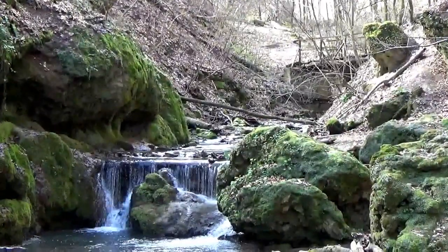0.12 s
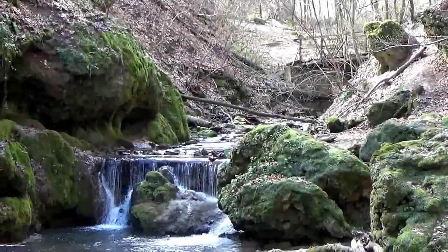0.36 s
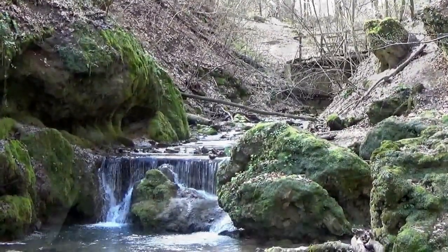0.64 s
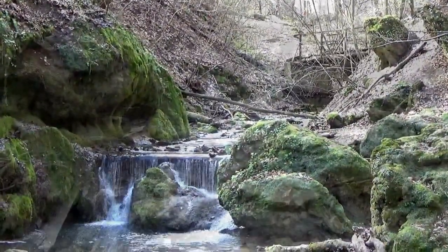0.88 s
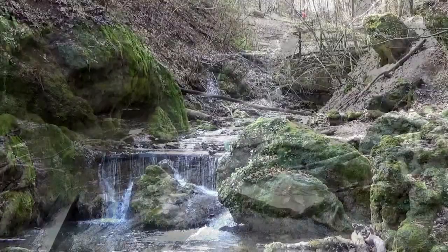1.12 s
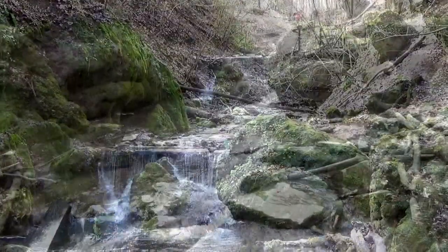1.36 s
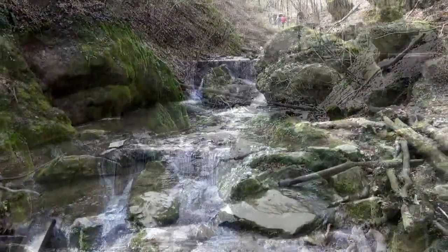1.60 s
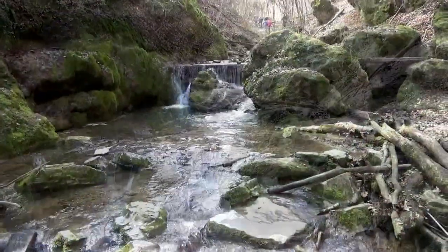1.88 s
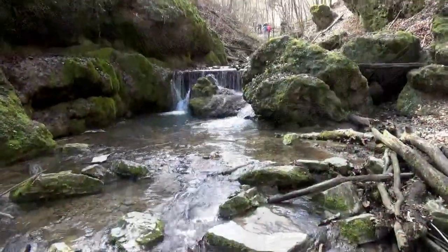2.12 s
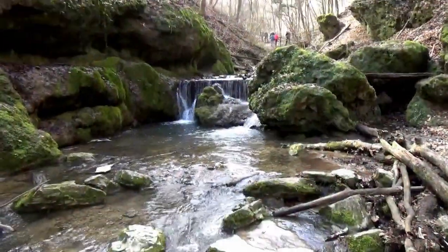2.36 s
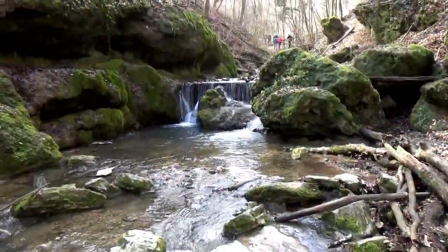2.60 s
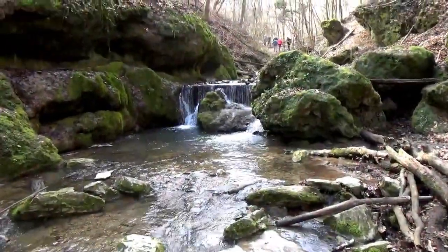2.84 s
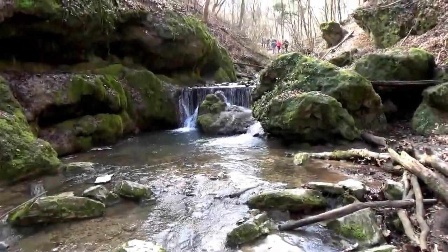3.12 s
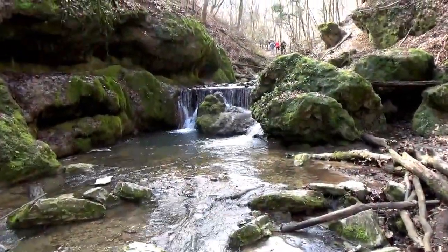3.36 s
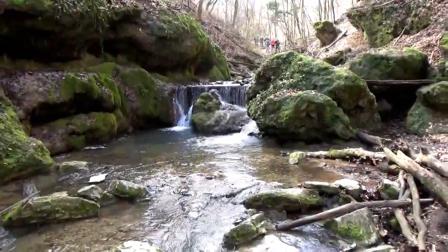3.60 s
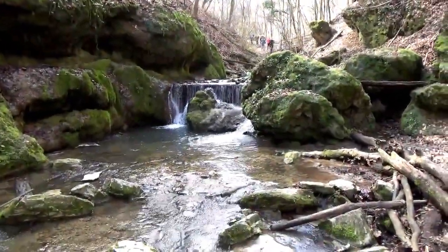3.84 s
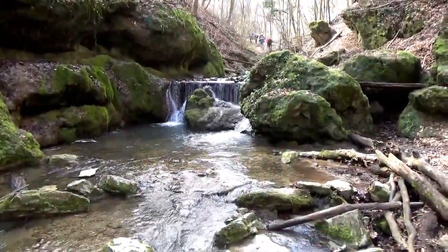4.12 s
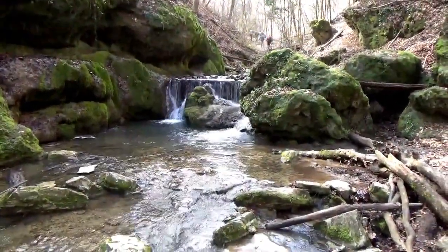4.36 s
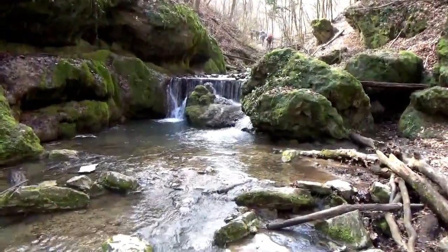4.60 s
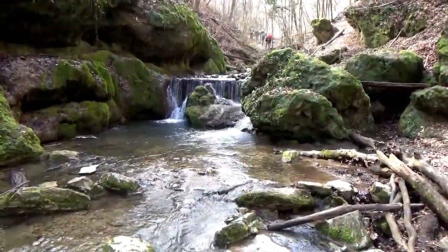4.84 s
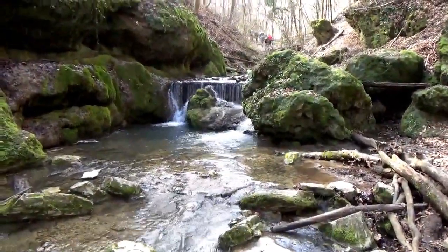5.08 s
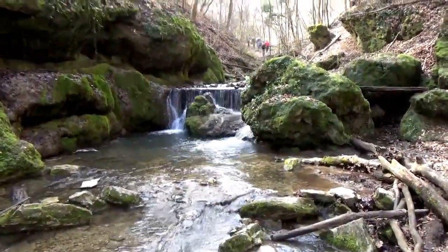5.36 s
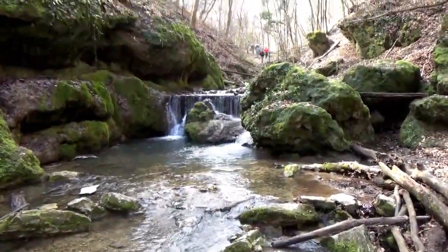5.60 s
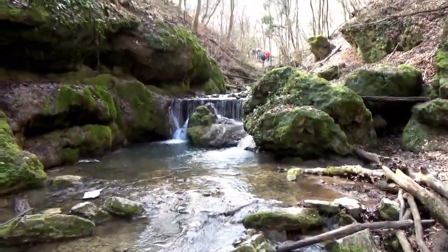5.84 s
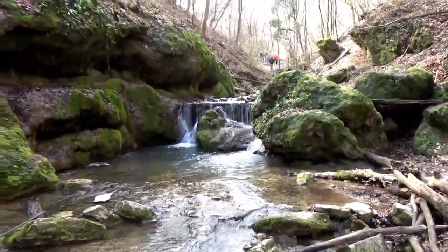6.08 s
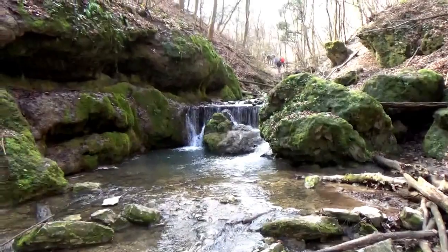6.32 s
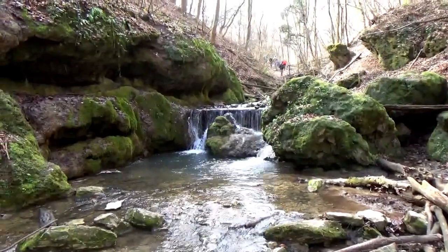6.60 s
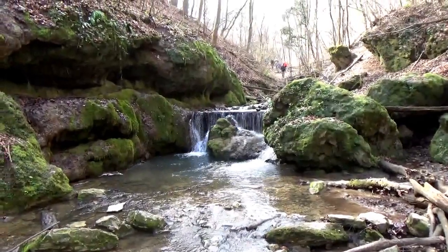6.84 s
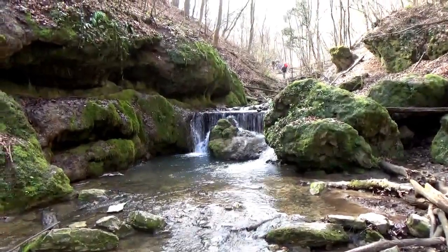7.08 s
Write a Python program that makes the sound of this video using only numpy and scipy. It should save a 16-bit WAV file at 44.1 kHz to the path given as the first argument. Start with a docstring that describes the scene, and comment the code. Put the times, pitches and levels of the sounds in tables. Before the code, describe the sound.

Steady rushing water from a little waterfall softens, then grows louder and more babbling, with bright drips, gurgles and a few splashy crackles.

```python
"""A wooded valley, where a small creek pours over a low cascade and runs on between mossy rocks.
Bands of flickering noise make the rush; clumped random bubbles, small and large, make spatter and babble.
Chosen drops, gurgles, side crackles, faint thuds and a patter of spray stand out as rings, snaps and bumps.
The listening place changes early on: the falls close up fade into the shallows further downstream."""
import sys
import numpy as np
from scipy import signal
from scipy.fft import rfft, irfft
from scipy.io import wavfile
from scipy.ndimage import uniform_filter1d

SR = 44100
rng = np.random.default_rng(int(sys.argv[2]) if len(sys.argv) > 2 else 0)


def undo_db(level):
    """Turn decibels back into plain size, where 20 dB means ten times bigger."""
    steps = np.asarray(level, float) / 20
    return 10 ** steps


def unload_wav(signal):
    """Save mono or channel-first audio to the path in sys.argv[1] as 16-bit WAV at rate SR, clipped to [-1, 1]."""
    wavfile.write(
        sys.argv[1],
        SR,
        np.round(np.clip(np.atleast_2d(signal).T, -1, 1) * 32767).astype(np.int16),
    )


N = 317961

# Loudness of the running water. Each row: time in seconds, level in dB rms.
WATER_LEVEL = [(0.0, -34.5), (0.6, -34), (1.12, -37.5), (1.7, -35.5), (2.31, -30), (2.61, -31),
               (4.54, -30.5), (5.38, -31), (6.0, -31), (6.36, -31.5), (7.21, -31)]
# Colour of the rush at the falls. Each row: frequency in Hz, relative density in dB per Hz.
FALLS_COLOUR = [(35, -70), (60, -47), (200, -15.5), (380, -3), (650, -3.5), (900, -1), (1300, -1.5),
                (1800, 1.5), (2300, -1.5), (3000, -5.5), (6500, -8.5), (11600, -20.5)]
# Colour of the rush downstream. Each row: frequency in Hz, relative density in dB per Hz.
SHALLOWS_COLOUR = [(35, -67), (60, -33), (140, -27.5), (227, -6.5), (315, -7.5), (400, 2), (436, -2.5),
                   (769, 3), (1040, -0.5), (2050, 1.5), (2910, -2.5), (3460, -5), (5020, -4),
                   (10100, -15.5), (11000, -8), (14300, -59), (22000, -120)]
# Stereo width of the rush. Each row: frequency in Hz, side minus mid in dB.
RUSH_WIDTH = [(60, -16), (190, -20), (600, -20), (1070, -16), (1900, -15), (3370, -11.5), (6000, -12),
              (10700, -11)]
# Stereo balance of the rush. Each row: frequency in Hz, left minus right in dB.
RUSH_BALANCE = [(60, .2), (600, .2), (1070, .6), (1900, .3), (4000, 1.4), (10700, 1.2)]
# Loud single drops. Each row: time in seconds, level in dB, starting pitch in Hz, left minus right in dB.
LOUD_DROPS = [(0.1524, -17, 7000, 0), (0.3553, -17.5, 7050, 0), (0.6694, -19.5, 5850, 1),
              (1.8509, -16, 3340, 4), (2.127, -13, 5570, 3), (2.6643, -16, 4930, -1), (2.981, -13, 2240, 0),
              (3.2675, -16, 5900, 2), (3.4378, -11, 6660, 3), (3.8079, -17, 4700, 6),
              (4.0016, -15, 4030, 0), (4.0353, -11, 4050, 0), (4.45, -12, 3550, -1), (4.518, -16, 4300, -1),
              (4.539, -13.5, 3750, -2), (4.6389, -15, 4350, 0), (4.648, -13, 2750, 2),
              (4.943, -10, 5650, 3), (5.1721, -16, 3950, -1), (5.173, -14, 2580, 0), (5.4349, -15, 5850, 0),
              (5.7404, -14.5, 5030, 2), (5.992, -13.5, 4000, 1), (5.9964, -12, 4900, 2),
              (6.173, -14, 4500, 0), (6.3925, -17, 4030, 3), (6.4404, -14, 2700, -1),
              (6.7965, -11.5, 6800, 2), (7.1659, -12, 4800, 4), (7.19, -14.5, 8160, 3)]
# Big trapped bubbles. Each row: time in seconds, level in dB, starting pitch in Hz.
BIG_BUBBLES = [(0.4656, -18, 1700), (0.6661, -18, 1880), (0.8192, -26, 1030), (1.0119, -26, 670),
               (1.1969, -23, 2310), (1.288, -24, 1120), (1.4552, -21, 2070), (2.156, -15, 852),
               (2.439, -24.5, 504), (2.611, -18, 2280), (3.0516, -18.5, 1140), (3.331, -18, 2080),
               (3.4346, -20, 1220), (3.6343, -15, 2000), (3.68, -16, 980), (4.3251, -15.5, 1180),
               (4.386, -23, 950), (4.7211, -17, 2040), (4.8526, -21, 1380), (4.9399, -17, 2300),
               (4.9959, -21, 2100), (5.4054, -22, 830), (5.6358, -26.5, 400), (5.7613, -16, 1880),
               (5.975, -23, 720), (6.1469, -14, 1860), (6.44, -21, 2320), (6.7855, -22, 1380),
               (6.8517, -20.5, 530), (7.1031, -17, 2250)]
# Faint low bumps. Each row: start in seconds, peak in dB.
LOW_BUMPS = [(2.396, -45), (4.017, -56)]
# Short splashy crackles. Each row: time in seconds, burst level in dB.
SIDE_CRACKLES = [(1.2845, -37), (2.399, -29), (4.0375, -24), (4.0713, -30), (4.3253, -24.5), (4.3426, -33),
                 (4.385, -26), (4.4519, -32), (4.5028, -25), (4.554, -29), (5.958, -33), (4.519, -32),
                 (4.642, -32), (6.159, -26)]
# Colour of the crackles. Each row: frequency in Hz, relative density in dB per Hz.
CRACKLE_COLOUR = [(300, -40), (600, 1), (1300, 11), (2000, 4), (3300, 14), (4500, 11), (6000, -18),
                  (9000, -26), (12000, -50)]
# Fade from the falls to the shallows. Each row: time in seconds, share of the downstream place from 0 to 1.
DOWNSTREAM_SHARE = [(0.9, 0.0), (2.1, 1.0)]
# Brief gushes and a slight dip in the running water. Each row: centre in seconds, change in dB.
BRIEF_GUSHES = [(0.48, 2), (0.66, 1.5), (2.15, 1), (2.27, -0.5), (3.44, 0.5), (4.1, 1.5), (4.26, 1),
                (4.66, 1), (5.18, 0.5), (5.74, 1.5), (5.98, 0.5), (6.16, 2), (6.79, 1.5)]


def rms_one(x):
    """Scale to rms 1."""
    return x / np.sqrt(np.mean(x ** 2) + 1e-20)


def at_hz(points, hz):
    """Read a spectrum on a log-frequency axis."""
    point_hz, point_db = np.transpose(points)
    return np.interp(np.log(hz), np.log(point_hz), point_db)


def drift(rate):
    """Slow chance of spread 1, changing about rate times a second."""
    step, settle = 40, 2000     # samples per slow value, slow values let pass first
    r = np.exp(-2 * step * np.pi * rate / SR)
    noise = rng.standard_normal(N // step + settle + 2)
    slow = signal.lfilter([1], [1, -2 * r, r * r], noise)[settle:]
    return np.interp(np.arange(N) / step, np.arange(len(slow)), rms_one(slow))


def two_ports(x, lag):
    """A sound from one side reaches one microphone a little before the other (lag in samples)."""
    return x + np.gradient(x) * lag * np.array([[.5], [-.5]])


def bubble(hz, cycles, rise, swell):
    """A sine that swells for a cycle or so, then dies by 60 dB in so many cycles while any rise lifts its pitch."""
    turns = np.arange(int(cycles * SR / hz) + 2) * hz / SR
    start = 1 - np.exp(-(turns / swell) ** 2)
    ring = np.sin(2 * np.pi * turns * (1 + rise * turns / cycles))
    return start * ring * undo_db(-60 * turns / cycles)


def add(out, s, sound):
    """Lay a sound into the stereo field at time s."""
    at = round(s * SR)
    out[:, at:at + sound.shape[1]] += sound[:, :N - at]


def rush(downstream, surge_db, flicker_db):
    """Third-octave bands of noise; they surge together and flicker each on its own."""
    out, edges = 0, 40 * 2 ** np.arange(0, 8.4, 1 / 3)     # band edges in Hz
    surge = drift(18.0)
    white = rng.standard_normal((2, 2, N))      # neighbouring bands get unrelated noise
    for k, (low, high) in enumerate(zip(edges, edges[1:])):
        band = signal.butter(2, [low, high], "band", fs=SR, output="sos")
        mid, side = signal.sosfilt(band, white[k % 2])
        hz = np.sqrt(low * high)
        falls_db, shallows_db = at_hz(FALLS_COLOUR, hz), at_hz(SHALLOWS_COLOUR, hz)
        colour_db = (1 - downstream) * falls_db + downstream * shallows_db
        gain = undo_db(colour_db + surge_db * surge + flicker_db * drift(17.0))
        pair = mid + undo_db(at_hz(RUSH_WIDTH, hz)) * side * [[1], [-1]]
        out = out + gain * pair * undo_db(at_hz(RUSH_BALANCE, hz) * np.array([[.5], [-.5]]))
    return rms_one(out)


def grains(per_s, low_hz, high_hz, cycles, spread_db, clump_db, tilt_db, lag):
    """Random bubbles in clumps, dealt to sixteen pitches, each from its own direction."""
    sizes = undo_db(spread_db * np.minimum(rng.exponential(1, N), 3.5)) * rng.choice([-1, 1], N)
    born = rng.random(N) < per_s * undo_db(clump_db * drift(18.0)) / SR
    dealt, sides = rng.integers(0, 16, N), rng.uniform(-1, 1, 16)
    out = 0
    for k, hz in enumerate(np.geomspace(low_hz, high_hz, 16)):
        hits = sizes * born * (dealt == k)
        ring = signal.oaconvolve(hits, bubble(hz, cycles, rise=0.26, swell=0.71))[:N]
        tilt = undo_db(tilt_db * np.log2(hz / low_hz))      # dB per octave, louder upwards
        out = out + two_ports(ring, lag * sides[k]) * tilt
    return rms_one(out)


def spatter():
    """Dense, small, high bubbles with short rings."""
    return grains(900.0, low_hz=2360, high_hz=7470, cycles=11.0,
                  spread_db=4.0, clump_db=6.0, tilt_db=2.5, lag=0.94)


def babble():
    """Larger, lower bubbles that ring for more cycles."""
    return grains(500.0, low_hz=484.3, high_hz=2930, cycles=28.0,
                  spread_db=3.0, clump_db=4.5, tilt_db=3.16, lag=3.3)


def reflected(x, downstream):
    """A dull early echo off rock or water surface joins the direct sound and combs its colour."""
    dull_hz = 4000
    falls_echo, shallows_echo = (2.08, -0.11), (1.02, 0.084)    # delay in ms, signed strength
    dull = signal.sosfilt(signal.butter(2, dull_hz, fs=SR, output="sos"), x)
    at = np.arange(N)
    lag = np.sqrt(2) * SR / (2 * np.pi * dull_hz)   # the dulling itself delays a little
    for (ms, strength), share in [(falls_echo, 1 - downstream), (shallows_echo, downstream)]:
        echo = np.array([np.interp(at - ms * SR / 1000 + lag, at, side) for side in dull])
        x = x + strength * share * echo
    return x


def flowing(x):
    """The water is evened out over a third of a second, then follows the flow and its gushes."""
    gush_s = 0.012      # half width
    t = np.arange(N) / SR
    gush_db = sum(g * np.exp(-((t - s) / gush_s) ** 2) for s, g in BRIEF_GUSHES)
    db = np.interp(t, *np.transpose(WATER_LEVEL)) + gush_db
    power = uniform_filter1d(np.mean(x ** 2, axis=0), size=SR // 3)
    return undo_db(db) * x / np.sqrt(power)


def drops():
    """Each drop is a short higher ring together with a longer one that climbs slightly, as of a tiny bubble."""
    out = np.zeros((2, N))
    for s, db, hz, pan_db in LOUD_DROPS:
        gain = undo_db(db + pan_db * np.array([[.5], [-.5]]))
        start = s - 1.3 / hz        # the swell leads up to the listed time
        add(out, start, gain * bubble(hz, 16.0, rise=.06, swell=.9))
        add(out, start, gain * bubble(1.3 * hz, 7.0, rise=0, swell=.6))
    return out


def gurgles():
    """Large trapped bubbles ring and rise in pitch."""
    out = np.zeros((2, N))
    for s, db, hz in BIG_BUBBLES:
        ring = bubble(hz, cycles=19.7, rise=0.089, swell=0.9)
        add(out, s - 2.52 / hz, undo_db(db) * ring[None])
    return out


def crackles():
    """A hard snap and a burst of smaller ones dying away, reaching the right microphone first."""
    rise_s, fade_s, snap_over_db = 0.00045, 0.0035, 20      # the snap stands over its burst
    echo_s, echo_db = 0.00116, -13      # off a nearby rock face
    far_lag = 4     # samples by which the far microphone hears them later
    t = np.arange(N) / SR
    level, snaps = np.zeros(N), np.zeros(N)
    for s, db in SIDE_CRACKLES:
        late = t - s + 0.0013
        decay = np.where(late < 0, (late / rise_s) ** 2, late / fade_s)
        level = level + undo_db(db) * np.exp(-decay)
        snaps[round((s - .0012) * SR)] = undo_db(db + snap_over_db)
    rough = rng.standard_normal(N) * undo_db(3.7 * rng.exponential(1, N))
    snaps = snaps + level * rms_one(rough)
    colour = undo_db(at_hz(CRACKLE_COLOUR, np.arange(1, N // 2 + 2) * SR / N))
    near = irfft(rfft(snaps) * rms_one(colour), N)
    near = near + undo_db(echo_db) * np.roll(near, round(echo_s * SR))
    return np.array([np.roll(near, far_lag), near])


def thuds():
    """One short push on both microphones."""
    out = np.zeros((2, N))
    for s, db in LOW_BUMPS:
        add(out, s, undo_db(db) * np.hanning(round(0.0044 * SR))[None])
    return out


def patter():
    """A short dense shower of fine droplets on the pool, made of many short bubble rings."""
    from_s, to_s, edge_s, level_db = 4.33, 4.57, 0.02, -38.5
    t = np.arange(N) / SR
    outside = np.maximum(0, np.maximum(from_s - t, t - to_s))
    spray = grains(1500.0, low_hz=2620, high_hz=4700, cycles=14.0,
                   spread_db=3.5, clump_db=4.5, tilt_db=2.0, lag=1.5)
    return undo_db(level_db) * np.exp(-outside / edge_s) * spray


def scene():
    """Rush, spatter and babble swell with the flow; the loudest drops and bubbles stand out."""
    downstream = np.interp(np.arange(N) / SR, *np.transpose(DOWNSTREAM_SHARE))
    water = rush(downstream, surge_db=0.27, flicker_db=0.94)
    # single bubbles drown in the roar at the falls and come forward in the shallows
    babble_db = -11.5 + 5.64 * downstream
    mix = water + undo_db(-9) * spatter() + undo_db(babble_db) * babble()
    creek = flowing(reflected(mix, downstream)) + drops() + gurgles() + crackles() + patter()
    # the deep end is cut away below about 114 Hz, before the faint bumps join
    low_cut = signal.butter(2, 114, "high", fs=SR, output="sos")
    return signal.sosfilt(low_cut, creek) + thuds()


def roll_off(x):
    """The treble ends steeply here."""
    return signal.sosfilt(signal.butter(12, 11270, fs=SR, output="sos"), x)


def record(dry):
    """The top end is cut steeply above 11050 Hz."""
    top_cut = signal.ellip(10, .3, 40, 11050, fs=SR, output="sos")
    finished = signal.sosfilt(top_cut, dry)
    return roll_off(finished)


dry = scene()
out = record(dry)
unload_wav(out)
```